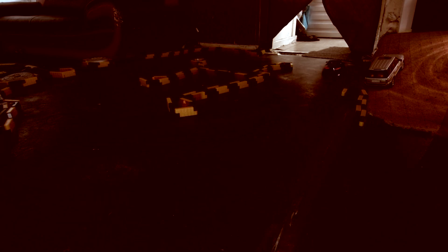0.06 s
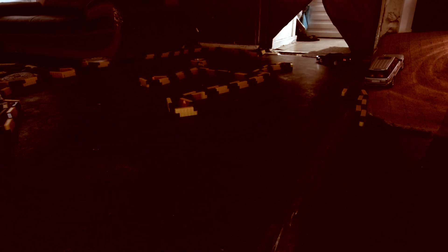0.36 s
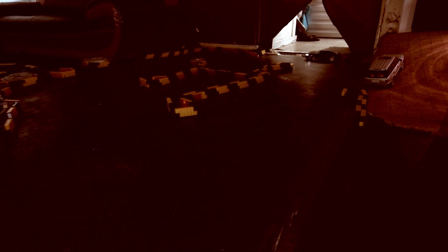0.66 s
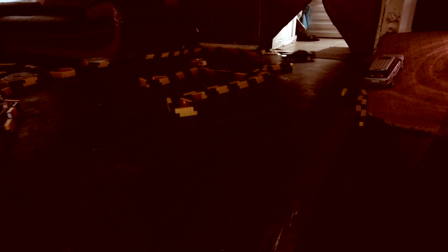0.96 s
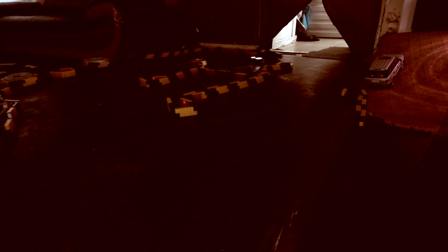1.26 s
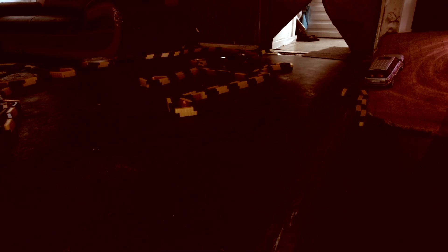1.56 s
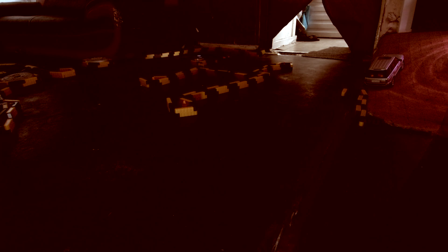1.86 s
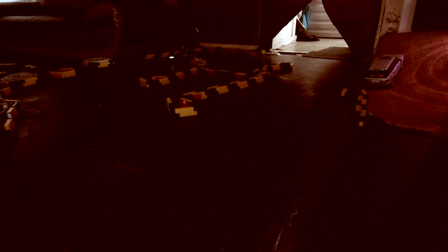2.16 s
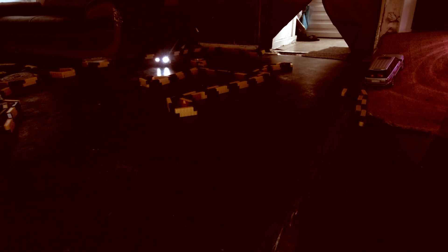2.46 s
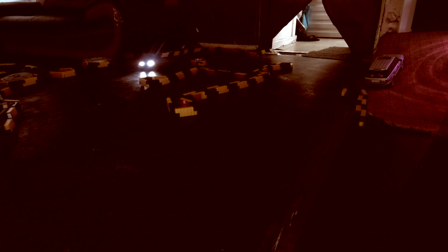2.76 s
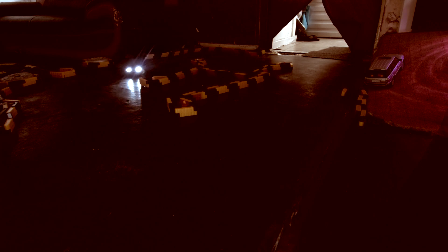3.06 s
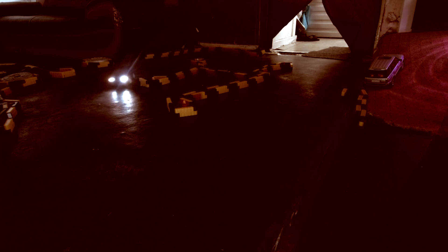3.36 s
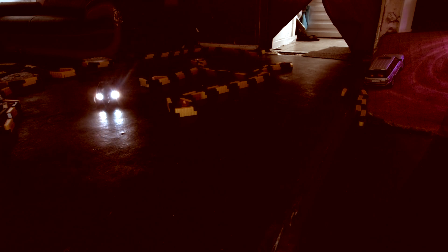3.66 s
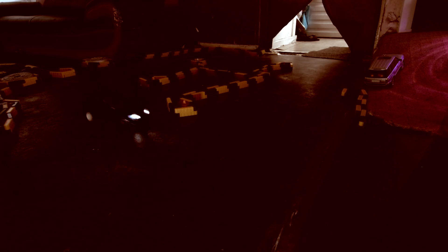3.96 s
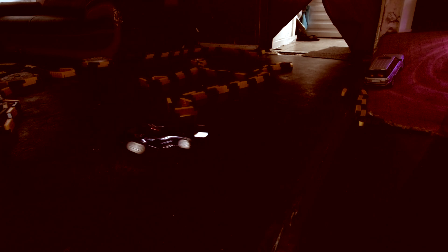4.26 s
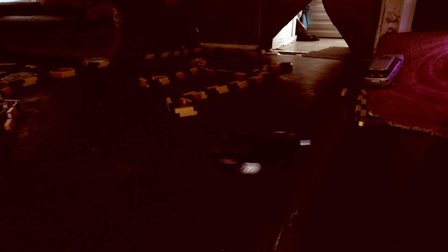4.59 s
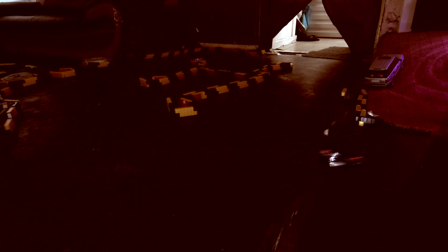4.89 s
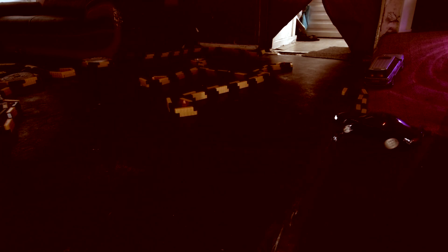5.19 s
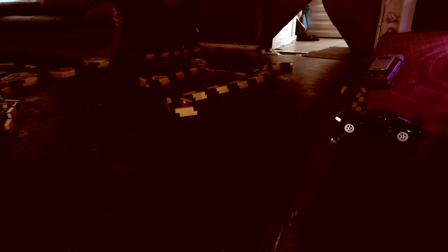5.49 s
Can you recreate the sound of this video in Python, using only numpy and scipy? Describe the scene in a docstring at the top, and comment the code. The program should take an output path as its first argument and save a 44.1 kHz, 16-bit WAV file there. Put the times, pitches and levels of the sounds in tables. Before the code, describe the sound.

A radio-controlled toy car drives on a hard living-room floor, its plastic gearbox making a high, fluttering whine with a fine clatter of teeth over soft tyre roll. For the first two seconds it is far off and slightly echoing, darting in five short bursts, the whine sagging briefly between them. At about 2.2 seconds one long run begins. From 3 seconds it grows louder and drier as it nears the microphone, with tiny chirps from the gears. Around 4.3 seconds it sweeps past at its loudest with a rough, sinking howl, and the chassis knocks lightly at 4.5 seconds. Near 5 seconds the tyres scrub faintly through a tight turn, with another knock. At 5.3 seconds the car bumps into something, gives one weak twitch and the whine dies away. A quiet room hum lies underneath throughout.

```python
"""A radio-controlled toy car darts over a hard living-room floor, far off, in five short bursts.
Its gear teeth whine and clatter in a plastic gearbox, throbbing with each turn of the spur gear;
the tyres roll and the chassis knocks now and then. From 2.2 s one long run brings it close, and around
4.3 s it sweeps past with a sinking howl. The tyres scrub through a tight turn, and at 5.3 s it bumps
into something and barely moves again. The room blurs it all, over a quiet hum."""
import sys
import numpy as np
from scipy import signal
from scipy.fft import rfft, irfft
from scipy.io import wavfile

SR = 44100
rng = np.random.default_rng(int(sys.argv[2]) if len(sys.argv) > 2 else 0)


def master(y):
    """Save y as 16-bit WAV."""
    cut = np.clip(np.atleast_2d(y).T, -1, 1)
    pcm = np.round(cut * 32767)  # scale
    wavfile.write(sys.argv[1], SR, pcm.astype(np.int16))


N = 243873

# throttle presses, each with its own mix trims:
# start_s, length_s, starting_share_of_full_speed, clatter_db, scuff_db, whine_db, fourth_harmonic_db
THROTTLE_PRESSES = [(-0.1, .42, 0.93, -0.5, 1.5, -4, 8.5), (0.512, .158, .8, -0.5, 0, -4.5, 7.5),
                    (0.789, .45, .78, 1, 0, 2.5, -7.5), (1.38, 0.19, 0.71, 0.5, -1.5, -4, 0),
                    (1.697, .42, .78, 0.8, -3.5, -1, -8.5), (2.215, 3.08, 0.74, 0.5, 0, 2.5, -6),
                    (5.375, .05, 0.49, 1, 4.5, -9.5, 8)]
# full speed, as steering and grip allow it: time_s, tooth_rate_hz
TOP_SPEED = [(0.0, 1430), (0.25, 1620), (0.58, 1420), (1.07, 1372), (1.16, 1500), (1.8, 1473), (2.11, 1360),
             (2.38, 1526), (2.52, 1480), (2.7, 1500), (2.82, 1462), (3.1, 1648), (3.42, 1518), (3.6, 1750),
             (3.74, 1576), (3.84, 1734), (4.1, 1760), (4.53, 1678), (5.12, 1695), (5.17, 1500),
             (5.24, 1600), (5.31, 1480)]
# how near the car is, as a lift over the far end of the room: time_s, gain_db
PROXIMITY = [(0.0, 1), (1.1, 0), (2.3, 1), (2.8, -0.2), (3.3, 3), (3.55, 5.5), (3.8, 5), (4.0, 8),
             (4.5, 8.5), (4.8, 6.5), (5.3, 6)]
# the leading whine beams out of one side of the car as it turns: time_s, gain_db
WHINE_BEAM = [(0.08, 1.5), (0.19, -5), (0.6, 1.5), (0.93, 3.5), (1.09, -4.5), (1.22, -9), (1.48, -0.5),
              (2.55, -2), (2.82, 2.5), (2.9, 5.5), (3.0, -0.5), (3.42, 0.5), (3.58, -1.5), (4.0, -2.5),
              (4.38, -1), (4.54, 3.5), (4.9, -4.5), (5.25, -5.5)]
# how well the gearbox radiates a tone: pitch_hz, gain_db
GEARBOX_RADIATION = [(2400, -11), (2800, -12.5), (3050, -15.5), (3300, -12.5), (3600, -18), (3900, -4),
                     (4100, -3), (4300, -3), (4500, -3.5), (4680, -8), (4950, -9.5), (5200, -13.5),
                     (5450, -18.5), (5750, -18), (6050, -29), (6400, -36), (7000, -27)]
# faint harmonics of the tooth rate that ride with the clatter: harmonic_number, gain_db
FAINT_HARMONICS = [(1, -5.5), (5, -5.5), (6, -11), (7, -15), (8, -20.5)]
# gearbox resonances: pitch_hz, width_hz, gain_db
GEARBOX_MODES = [(2516, 1220, -13.5), (3310, 230, -8), (3960, 464, 1.5), (4485, 460, -2), (4510, 505, -6),
                 (5204, 230, -5.5), (5620, 250, -12), (7440, 400, -21.5), (9300, 440, -21)]
# hiss of teeth sliding apart: frequency_hz, gain_db
SCUFF_SPECTRUM = [(3820, 4.5), (6500, 8), (8480, 1.5), (9390, -8), (9930, -2), (12300, -1.5), (15000, -3.5)]
# teeth catching hard: time_s, strength_db, length_s, harmonic_number
TOOTH_CATCHES = [(1.09, -27, 0.0087, 3), (3.2779, -26.5, 0.0055, 3), (3.306, -24.5, .008, 3),
                 (3.3837, -23.5, .0056, 3), (3.4121, -25.5, .0056, 3), (3.491, -24.5, 0.0057, 3),
                 (3.842, -32, 0.0069, 3), (4.4401, -25, 0.0092, 3), (4.469, -30, 0.008, 3),
                 (4.601, -33, 0.011, 3), (4.89, -35.5, 0.12, 2)]
# rough howl that sinks as the car sweeps past: time_s, pitch_hz, gain_db
PASS_BY_HOWL = [(3.75, 3990, -42), (3.9, 3886, -43), (4.101, 3862, -43.5), (4.251, 3928, -42),
                (4.33, 3730, -37.5), (4.422, 3550, -41.5), (4.5, 3502, -42), (4.65, 3410, -79)]
# hollow resonances of the body shell: pitch_hz, width_hz, gain_db
SHELL_MODES = [(220, 92, -13.5), (372, 145, -11), (1622, 190, 2.5), (2303, 370, 4), (2642, 131.7, 6.5)]
# small metal parts that ring in sympathy: pitch_hz, width_hz, gain_db
METAL_MODES = [(4330, 5.2, -16), (5186, 126, -8), (6500, 15, 0), (8370, 310, -5.5)]
# swell of the motor drone: time_s, gain_db
DRONE_FADER = [(0.9, -84), (1.5, -65), (1.75, -75), (2.08, -62), (2.35, -63), (2.6, -74), (5.3, -67.5)]
# tyre roll, louder close by and in turns: time_s, gain_db
ROLL_FADER = [(0.1, -60.5), (0.6, -65), (1.1, -64), (1.45, -63.5), (2.15, -60.5), (2.7, -64.5), (3.5, -60),
              (4.45, -57), (4.75, -59.5)]
# chassis resonances: pitch_hz, width_hz, gain_db
CHASSIS_MODES = [(738, 160, -9.5), (986, 92, -1), (1162, 112, -1), (1313, 234, 0.5), (1450, 260, -3),
                 (2110, 1440, -9.5)]
# low rumble of the tyres: frequency_hz, gain_db
RUMBLE_SPECTRUM = [(60, -3), (120, -31), (240, -1.5), (400, 0), (700, -0.5), (1000, -2)]
# knocks of the chassis: start_s, strength_db, thud_trim_db, snap_trim_db
CHASSIS_KNOCKS = [(0.76, -52, -6, 12), (1.382, -49, -0.5, 4.5), (3.68, -49, 1, 15), (4.497, -42.5, 2, 1.0),
                  (4.539, -42, -2.5, 4), (5.092, -37.5, 3.5, -3), (5.099, -44, 4.5, -21),
                  (5.31, -38.5, -3.5, 3.5), (5.392, -42.5, -0.5, -3)]
# room tone: frequency_hz, gain_db
ROOM_SPECTRUM = [(30, 8), (100, -2), (260, 3.5), (450, -7), (1200, -2), (4000, 5), (8000, -8), (15000, -36)]
# mains hum: pitch_hz, level_db
MAINS_HUM = [(100, -90), (150, -90), (253, -87)]
# air stirring at the microphone: frequency_hz, gain_db
AIR_SPECTRUM = [(8, 5.5), (25, -1), (50, 4), (75, -21), (110, -2), (200, -22)]

TIME_S = np.arange(N) / SR


def whine(teeth, tooth_hz, load, third_db, second_db, fourth_db, faint_db):
    """Meshing teeth sing: the third harmonic hits the gearbox resonances and leads, the rest sputter."""
    def radiated(harmonic, db):
        return from_db(db + curve(GEARBOX_RADIATION, at=harmonic * tooth_hz))
    def side_tone(harmonic):
        sputter = rms_one(load * flicker(depth_db=3.5, rate_hz=44))
        return sputter * rough_tone(harmonic * teeth, scatter_rad=0.59 * np.sqrt(harmonic), rate_hz=130)
    shimmer = rms_one(load * flicker(depth_db=2.5, rate_hz=88))
    lead = radiated(3, third_db) * shimmer * rough_tone(3 * teeth, scatter_rad=0.45, rate_hz=174)
    sides = radiated(2, second_db) * side_tone(2) + radiated(4, fourth_db) * side_tone(4)
    faint = sum(from_db(faint_db + db) * side_tone(harmonic) for harmonic, db in FAINT_HARMONICS)
    return lead + sides + faint


def clatter(teeth, load, clatter_db, scuff_db):
    """Each tooth taps the gearbox with a force of its own and scuffs as it slides off."""
    force = load ** 0.61
    contacts = np.diff(np.floor(teeth), prepend=0)
    taps = contacts * force * flicker(depth_db=3.5, rate_hz=590)
    box = rms_one(ring_body(taps, GEARBOX_MODES))
    scuff = noise(SCUFF_SPECTRUM, envelope=force * flicker(depth_db=2.9, rate_hz=400))
    return from_db(clatter_db) * box + from_db(scuff_db) * scuff


def throttle(attack_s=0.033, release_s=0.016, spin_up_s=0.055, coast_s=0.4):
    """Each press loads the gears and spins them up; gives drive (0-1), pace (0-1) and four trims in dB."""
    presses = np.array(THROTTLE_PRESSES)
    current = np.maximum(np.searchsorted(presses[:, 0], TIME_S) - 1, 0)
    start_s, length_s, start_pace, *trims_db = presses[current].T
    held_s = np.maximum(TIME_S - start_s, 0)
    released_s = np.maximum(held_s - length_s, 0)
    drive = np.minimum(held_s / attack_s, 1) * np.exp(-released_s / release_s)
    pace = (1 - (1 - start_pace) * np.exp(-held_s / spin_up_s)) * np.exp(-released_s / coast_s)
    return drive, pace, *trims_db


def gear_motion(tooth_hz, spur_teeth=23.3, runout=0.009):
    """Teeth passed and spur angle; wheel slip, backlash and an off-centre gear make the pitch waver."""
    spur_rad = 2 * np.pi * np.cumsum(tooth_hz) / SR / spur_teeth
    unsteadiness = 2 ** ((tooth_hz - 1500) / 349.2)   # the faster, the shakier
    wobble = unsteadiness * (0.014 * drift(45) + 0.008 * drift(260))
    wavering_hz = tooth_hz * (1 + wobble + runout * np.sin(spur_rad))
    return np.cumsum(wavering_hz) / SR, spur_rad


def tooth_load(spur_rad, throb_db=3.0, jolt_db=0.22):
    """The teeth press harder once per turn of the spur gear, unevenly, and at every jolt of the wheels."""
    throb = np.cos(spur_rad + 0.33 * drift(40)) * (1 + 0.41 * drift(28))
    return from_db(throb_db * throb) * flicker(jolt_db, rate_hz=60)


def catches(teeth, trim_db=-5.5):
    """Where teeth bind for a moment, one harmonic of the whine swells and falls back."""
    chirps = 0
    for time_s, strength_db, length_s, harmonic in TOOTH_CATCHES:
        swell = np.interp(TIME_S - time_s - 0.002, np.linspace(-0.5, 0.5, 33) * length_s, np.hanning(33))
        tone = rough_tone(harmonic * teeth, scatter_rad=0.67, rate_hz=140)
        chirps += from_db(strength_db + trim_db) * swell * tone
    return chirps


def pass_by(load, closest_s=4.3, spread_s=0.42, growl_db=-53.5):
    """Close to the microphone the car howls roughly and its hollow shell growls."""
    times_s, pitch_hz, gain_db = np.transpose(PASS_BY_HOWL)
    cycles = np.cumsum(np.interp(TIME_S, times_s, pitch_hz)) / SR
    fader = from_db(np.interp(TIME_S, times_s, gain_db) - 1) * gate(times_s[0], times_s[-1], fade_s=0.11)
    howl = fader * rms_one(load) * rough_tone(cycles, scatter_rad=1.52, rate_hz=81)
    closeness = np.exp(-0.5 * ((TIME_S - closest_s) / spread_s) ** 2)
    growl = rms_one(ring_body(flicker(depth_db=4.2, rate_hz=117.9), SHELL_MODES))
    return howl + closeness * from_db(growl_db) * growl


def metal_ring(gears):
    """Small metal parts ring on in sympathy with the gears."""
    return sum(from_db(db) * resonate(gears, hz, width_hz) for hz, width_hz, db in METAL_MODES)


def motor_drone(teeth, drive, slowdown, pitch_ratio=0.46):
    """Under power the motor hums at a set fraction of the tooth rate, fainter at low speed."""
    level_db = curve(DRONE_FADER) - 8.5 - 45 * slowdown
    return drive * from_db(level_db) * rough_tone(pitch_ratio * teeth, scatter_rad=1.26, rate_hz=51)


def tyre_roll(drive, slowdown):
    """The grain of the floor shakes the chassis through the wheels, fading as the car coasts."""
    roll_db = curve(ROLL_FADER) - 18.5 * slowdown * (1 - drive)
    chassis = rms_one(ring_body(flicker(depth_db=3, rate_hz=130), CHASSIS_MODES))
    return from_db(roll_db - 1) * chassis + from_db(roll_db - 15) * noise(RUMBLE_SPECTRUM)


def tyre_scrub(level_db=-62, pitch_hz=1013, width_hz=110):
    """In the last tight turn, rubber grabs and slips sideways and rings the chassis."""
    grabs = flicker(depth_db=3, rate_hz=55)
    scrub = rms_one(ring_body(grabs, [(pitch_hz, width_hz, 0)]))
    return gate(start_s=4.9, end_s=5.33, fade_s=0.048) * from_db(level_db) * scrub


def knocks(decay_s=0.0031):
    """Jolts draw a thud from the chassis and a snap from the gearbox."""
    start_s, strength_db, thud_trim_db, snap_trim_db = np.transpose(CHASSIS_KNOCKS)
    thud_hits = strikes(start_s, strength_db + thud_trim_db, decay_s)
    snap_hits = strikes(start_s, strength_db + snap_trim_db, decay_s)
    thud = from_db(13.5) * ring_body(thud_hits, CHASSIS_MODES)
    snap = from_db(15) * ring_body(snap_hits, GEARBOX_MODES)
    rumble = from_db(-23.5) * thud_hits * noise(RUMBLE_SPECTRUM)
    return thud + snap + rumble


def room(car, wet, early_decay_s=0.0067, tail_db=-0.5, reverb_s=0.63):
    """Direct sound, quick reflections from floor and furniture, and a short diffuse tail."""
    t = np.arange(SR * 3 // 4) / SR
    early = rng.standard_normal(len(t)) * np.exp(-t / early_decay_s) * (t > 0.002)
    tail = rng.standard_normal(len(t)) * from_db(-60 * t / reverb_s) * (t > 0.008)
    response = early / np.linalg.norm(early) + from_db(tail_db) * tail / np.linalg.norm(tail)
    direct = car / np.sqrt(1 + wet ** 2)
    return direct + signal.fftconvolve(direct * wet, response / np.linalg.norm(response))[:N]


def background(room_db=-67, air_db=-81):
    """A quiet bed of room tone, mains hum and air on the microphone."""
    hum = sum(from_db(db) * np.sin(2 * np.pi * (hz * TIME_S + rng.random())) for hz, db in MAINS_HUM)
    return from_db(room_db) * noise(ROOM_SPECTRUM) + np.sqrt(2) * hum + from_db(air_db) * noise(AIR_SPECTRUM)


def from_db(db):
    """Decibels to gain."""
    return 10 ** (np.asarray(db) / 20)


def rms_one(x):
    """Scale to unit power."""
    return x / np.sqrt(np.mean(x ** 2) + 1e-20)


def curve(points, at=TIME_S):
    """Glide between breakpoints, by default along the timeline."""
    return np.interp(at, *np.transpose(points))


def gate(start_s, end_s, fade_s):
    """Fade in, hold, fade out."""
    return np.clip(np.minimum(TIME_S - start_s, end_s - TIME_S) / fade_s, 0, 1)


def drift(rate_hz):
    """Smooth random wander of spread 1, drawn at an eighth of the sample rate."""
    pole = np.exp(-16 * np.pi * rate_hz / SR)
    slow = signal.lfilter([1], [1, -2 * pole, pole * pole], rng.standard_normal(N // 8 + 4002))[4000:]
    return np.interp(np.arange(N) / 8, np.arange(len(slow)), rms_one(slow))


def flicker(depth_db, rate_hz):
    """A gain that wavers at random around 1."""
    return from_db(depth_db * drift(rate_hz))


def rough_tone(cycles, scatter_rad, rate_hz):
    """A tone of rms 1 whose phase is scattered by loose parts."""
    return np.sqrt(2) * np.sin(2 * np.pi * (cycles + rng.random()) + scatter_rad * drift(rate_hz))


def noise(spectrum, envelope=1):
    """Noise of rms 1, coloured by a spectrum that rolls off beyond its ends."""
    hz, db = np.transpose(spectrum)
    bins_hz = np.maximum(np.fft.rfftfreq(N, 1 / SR), 1)
    roll_off = 1 / np.sqrt((1 + (hz[0] / bins_hz / 1.2) ** 8) * (1 + (bins_hz / hz[-1] / 1.2) ** 8))
    colour = from_db(np.interp(np.log(bins_hz), np.log(hz), db))
    return rms_one(irfft(rfft(envelope * rng.standard_normal(N)) * roll_off * colour, N))


def resonate(x, hz, width_hz):
    """One resonance with gain 1 at its peak."""
    radius = np.exp(-np.pi * width_hz / SR)
    feedback = [1, -2 * radius * np.cos(2 * np.pi * hz / SR), radius ** 2]
    return signal.lfilter(np.array([1, 0, -1]) * (1 - radius ** 2) / 2, feedback, x + 1e-18)


def ring_body(force, modes):
    """Steep-sided resonances, each shaken by its own noise under one force envelope."""
    ringing = 0
    for hz, width_hz, db in modes:
        first_pass = resonate(force * rng.standard_normal(N), hz, 1.25 * width_hz)
        ringing += from_db(db) * resonate(first_pass, hz, 1.25 * width_hz)
    return ringing


def strikes(times_s, levels_db, decay_s):
    """Envelope of sudden contacts that die away."""
    hits = np.zeros(N)
    hits[np.round(times_s * SR).astype(int)] = from_db(levels_db)
    return signal.lfilter([1], [1, -np.exp(-1 / (decay_s * SR))], hits + 1e-18)


def scene(bump_s=5.31, stopping_s=0.086, stopped_db=-9.5):
    """Mix the car into the room; throttle, speed and nearness ride the faders of the gear layers."""
    drive, pace, clatter_trim_db, scuff_trim_db, whine_trim_db, fourth_trim_db = throttle()
    near_db = curve(PROXIMITY)
    tooth_hz = pace * curve(TOP_SPEED)
    slowdown = 1 - pace
    def duck_db(coasting_db):
        return 20 * np.log10(drive + from_db(coasting_db) * pace * (1 - drive))
    tone_db = duck_db(coasting_db=-18) - 0.5 * (1 - drive)   # slack teeth lose more tone than clatter
    third_db = -39.5 + 0.88 * near_db + tone_db + whine_trim_db - 24.5 * slowdown + curve(WHINE_BEAM)
    second_db = -42.5 + 0.99 * near_db + tone_db - 23 * slowdown
    fourth_db = third_db + fourth_trim_db
    clatter_db = -50 + 0.94 * near_db + duck_db(coasting_db=-9) + clatter_trim_db
    scuff_db = -66.5 + 1.39 * near_db + duck_db(coasting_db=-13) + scuff_trim_db - 3 * slowdown
    moving = from_db(curve([(bump_s, 0), (bump_s + stopping_s, stopped_db)]))
    teeth, spur_rad = gear_motion(tooth_hz)
    load = tooth_load(spur_rad)
    gears = whine(teeth, tooth_hz, load, third_db, second_db, fourth_db, faint_db=clatter_db - 17)
    gears += clatter(teeth, load, clatter_db, scuff_db) + catches(teeth) + pass_by(load)
    gears *= moving
    underlay = moving * (motor_drone(teeth, drive, slowdown) + tyre_roll(drive, slowdown))
    car = gears + metal_ring(gears) + underlay + tyre_scrub() + knocks()
    wet = from_db(-1 - 1.32 * near_db)   # the closer, the drier
    return (room(car, wet) + background())[None]


def record(dry, mic_bend=10.6, flutter_band_hz=(1.07, 10.9), cutoff_hz=15250):
    """A slightly lopsided microphone turns the throbbing whine into deep flutter; the top is cut hard."""
    flutter_band = signal.butter(1, flutter_band_hz, "band", fs=SR, output="sos")
    flutter = signal.sosfilt(flutter_band, mic_bend * dry ** 2)
    high_cut = signal.ellip(12, 0.1, 80, cutoff_hz, fs=SR, output="sos")
    return signal.sosfilt(high_cut, dry + flutter)


dry = scene()
out = record(dry)
master(out)
```